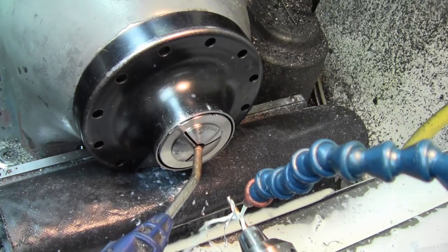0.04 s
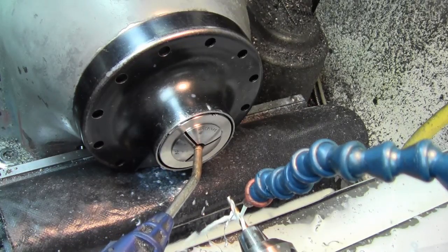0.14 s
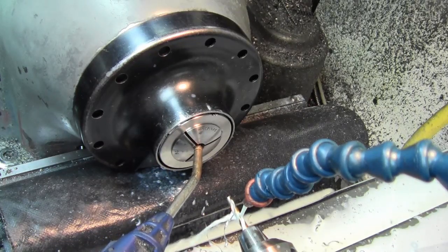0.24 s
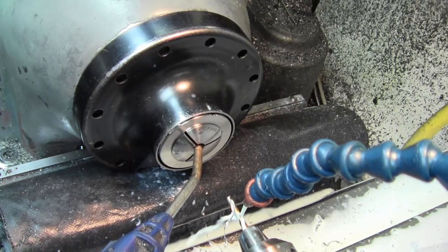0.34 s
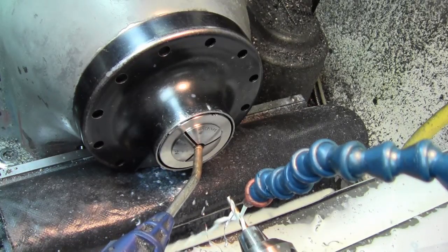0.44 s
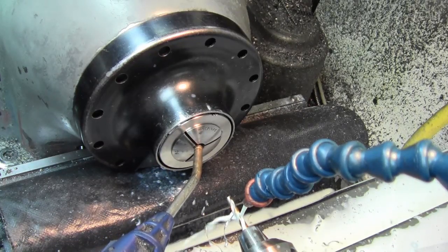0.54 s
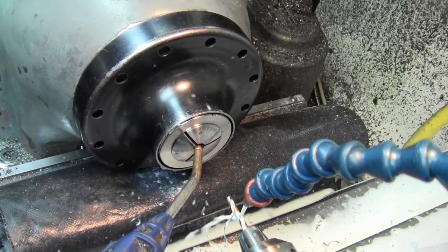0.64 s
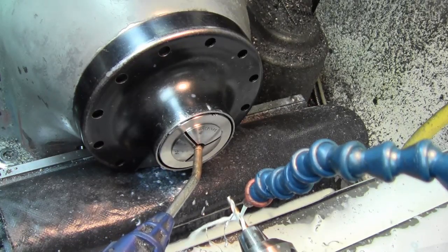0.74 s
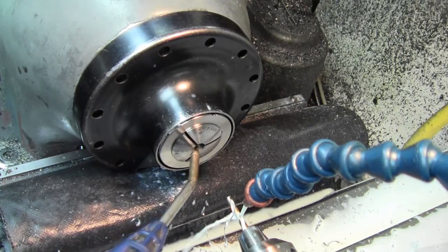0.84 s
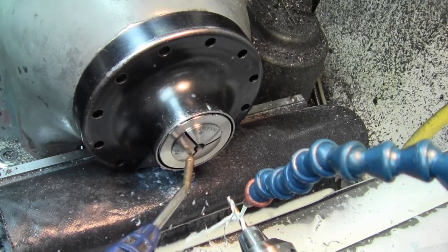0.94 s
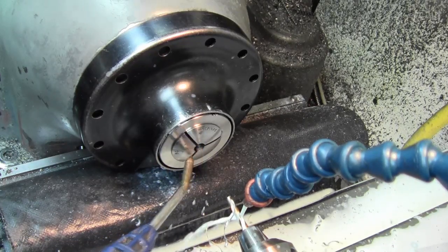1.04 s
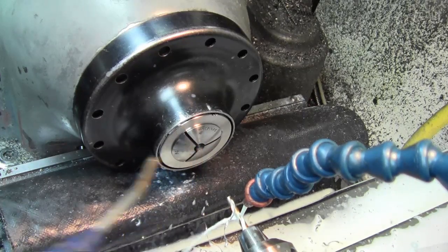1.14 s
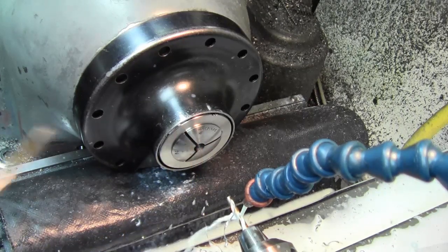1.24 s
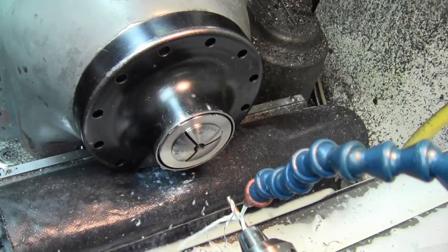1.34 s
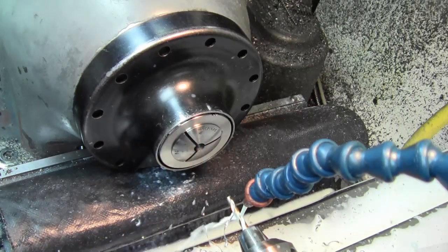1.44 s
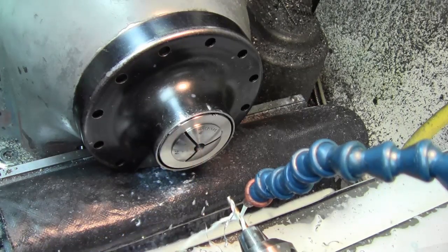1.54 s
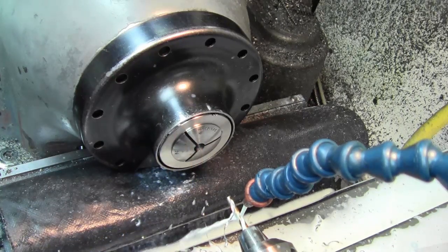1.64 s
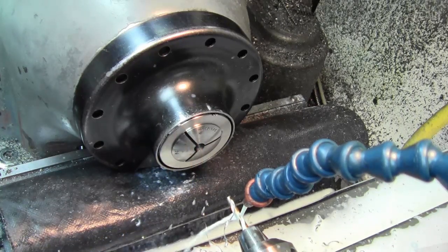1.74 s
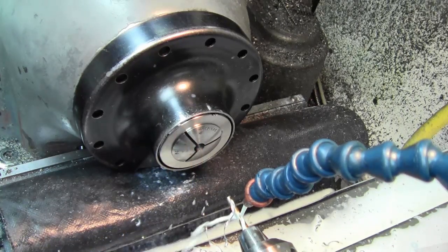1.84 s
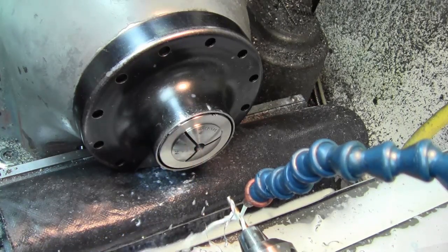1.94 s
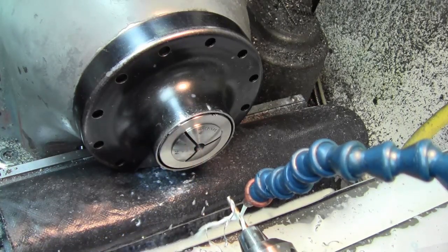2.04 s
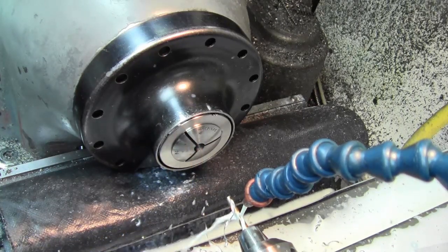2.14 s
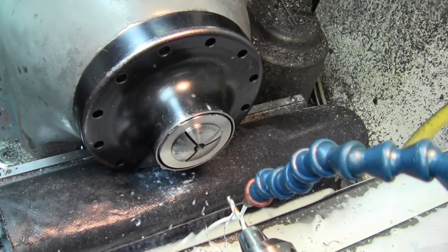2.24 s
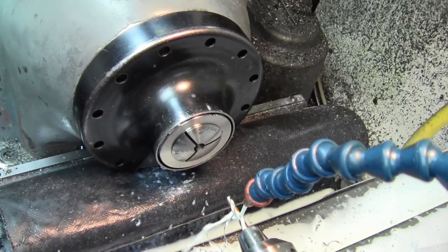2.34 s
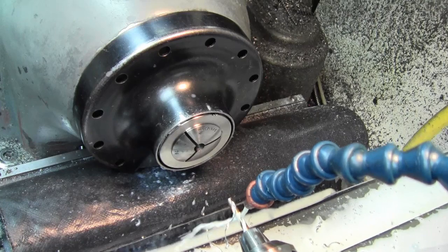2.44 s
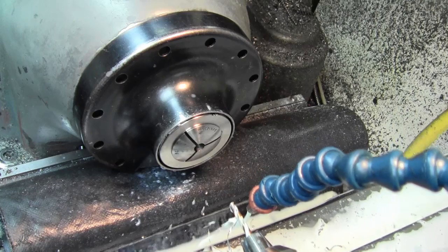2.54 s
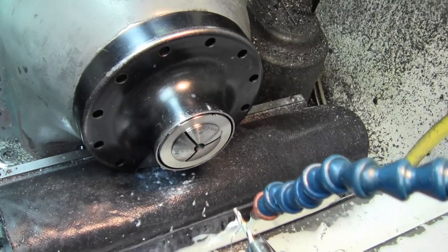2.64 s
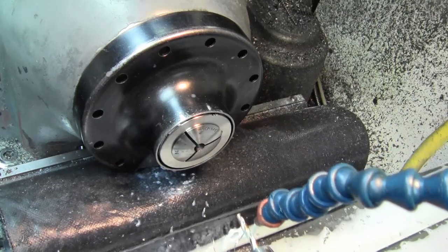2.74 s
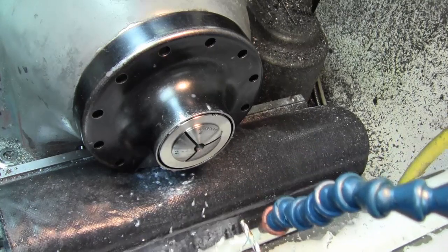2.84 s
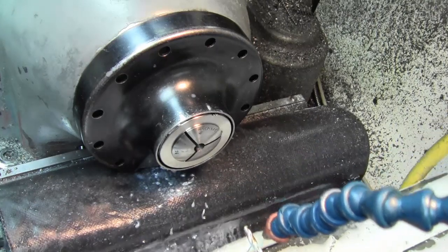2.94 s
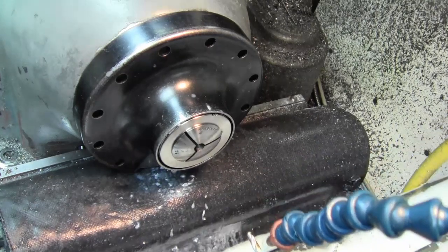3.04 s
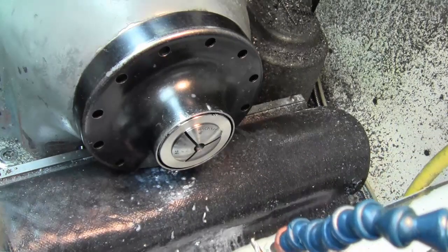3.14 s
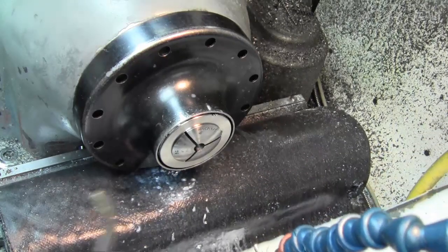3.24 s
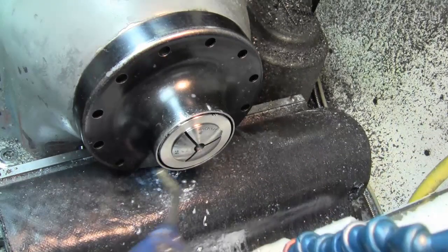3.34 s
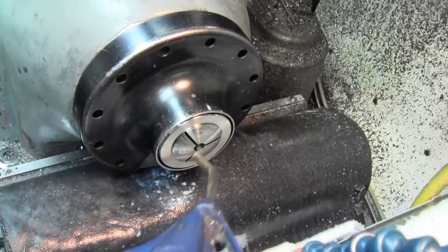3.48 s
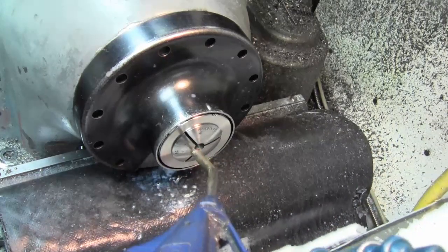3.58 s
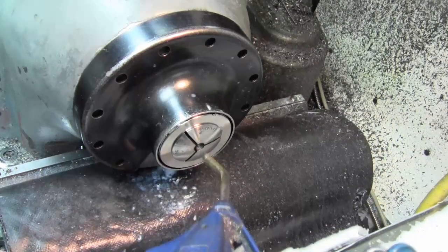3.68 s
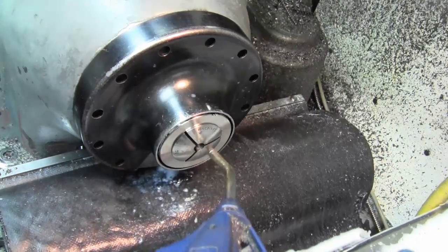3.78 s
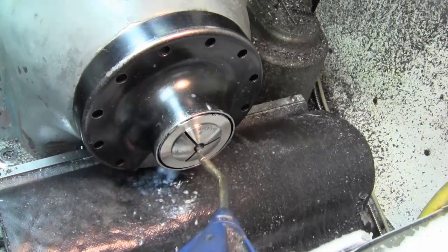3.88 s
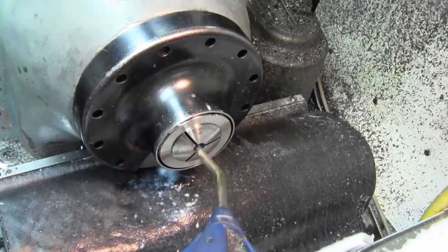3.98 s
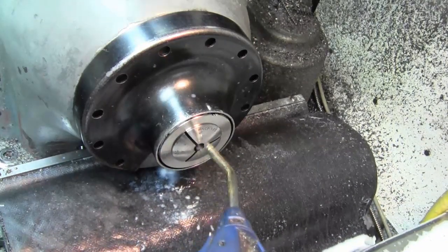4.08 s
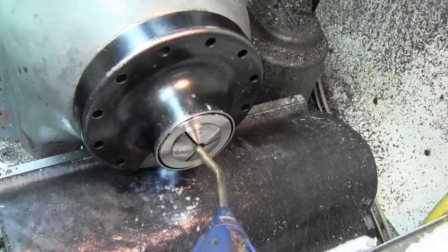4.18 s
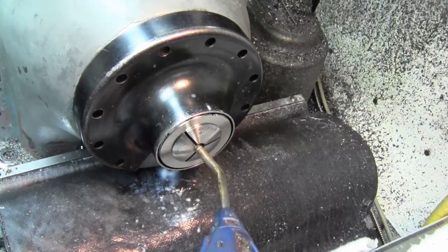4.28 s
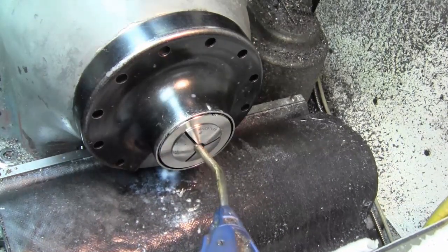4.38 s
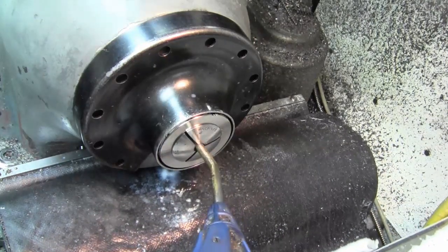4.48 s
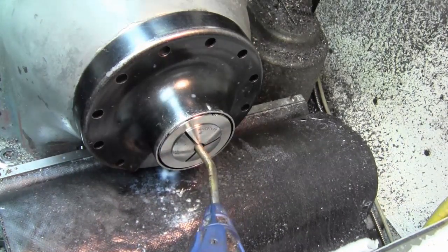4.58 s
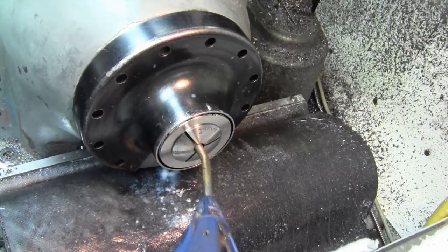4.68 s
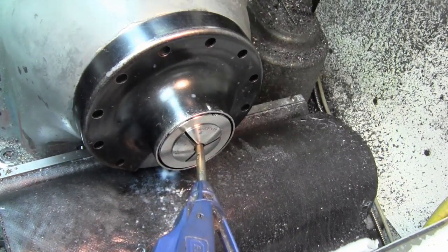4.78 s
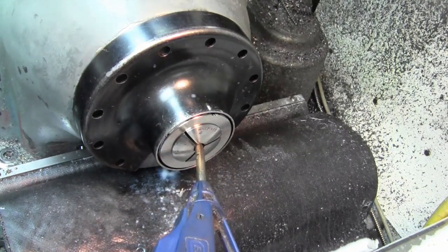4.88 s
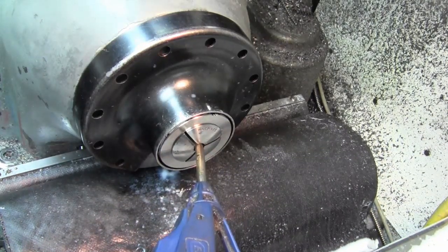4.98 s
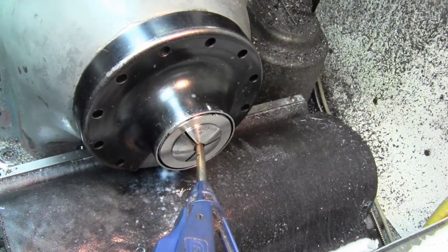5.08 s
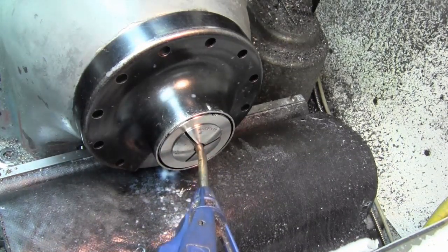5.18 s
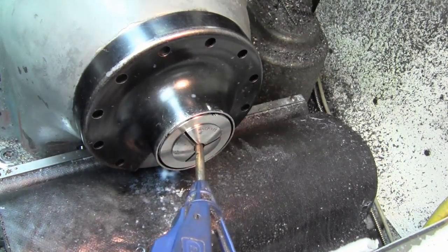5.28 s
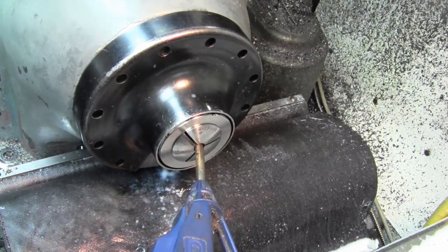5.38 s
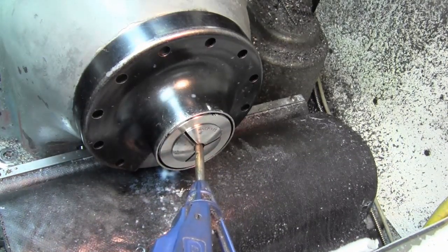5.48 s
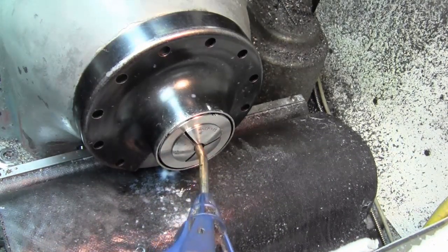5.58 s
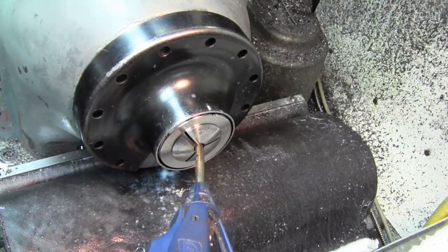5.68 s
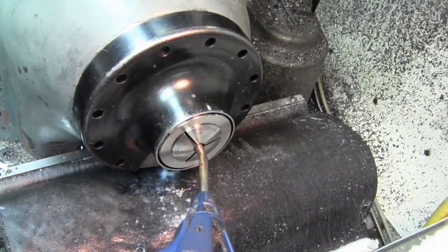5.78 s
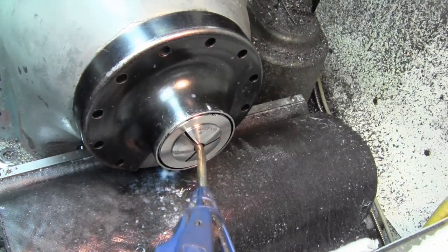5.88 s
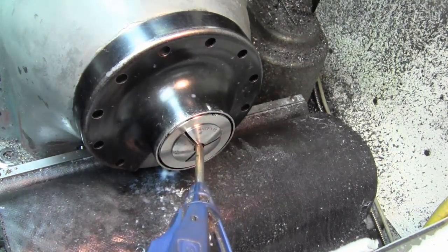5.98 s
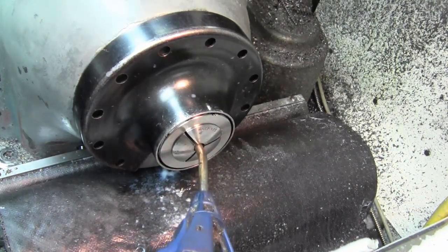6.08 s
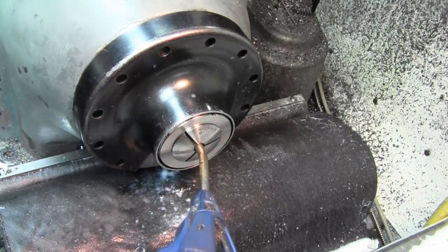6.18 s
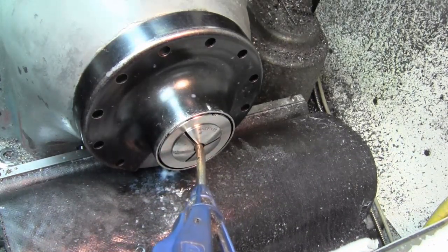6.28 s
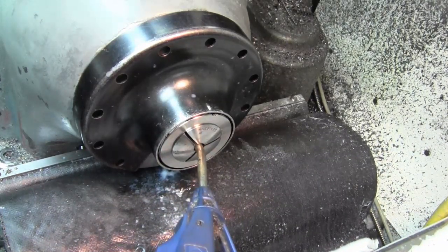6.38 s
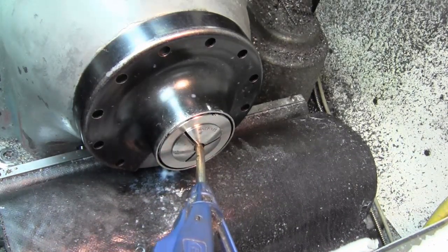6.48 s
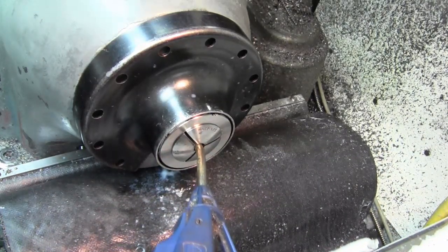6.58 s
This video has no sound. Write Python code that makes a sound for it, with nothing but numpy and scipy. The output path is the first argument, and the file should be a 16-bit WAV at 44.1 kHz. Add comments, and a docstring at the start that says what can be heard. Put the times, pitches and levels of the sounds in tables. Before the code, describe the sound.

Very close, a compressed-air gun roars and hisses on a metal rim for a second, then cuts off abruptly. A machine's pump whines and hums quietly, slowly seeming louder, with dull bumps as a hose is moved. Steel clicks sharply, and a second blast bursts out, sweeping brightly before settling into a steady hiss with breathy, ringing whistle tones. Workshop, short room tail, stereo.

```python
"""A compressed-air gun blows chips out of a lathe collet in two blasts, close to the microphones.
Each jet is flow noise, filtered and fluttering: the first breaks on the collet's rim; the second
crosses its face, then settles in a slot, where noise-driven resonators make the cavity behind it ring.
Between the blasts a hydraulic pump whines as a comb of harmonics, decaying noise bursts make soft bumps,
metal clicks once as damped partials, and a gain control creeps back up."""
import sys
import numpy as np
from scipy import signal
from scipy.fft import rfft, irfft
from scipy.io import wavfile
from scipy.ndimage import uniform_filter1d

SR = 44100
rng = np.random.default_rng(int(sys.argv[2]) if len(sys.argv) > 2 else 0)


def transcribe(signal):
    """Save signal, clipped to [-1, 1], as a 16-bit WAV file at the path in sys.argv[1]."""
    frames = np.atleast_2d(signal).T
    limited = np.clip(frames, -1, 1)
    pcm = np.round(limited * 32767).astype(np.int16)
    wavfile.write(sys.argv[1], SR, pcm)


N = 291942
T = np.arange(N) / SR  # time axis [s]
HZ = np.fft.rfftfreq(N, 1 / SR)  # frequency axis [Hz]
GAIN_RANGE_DB = 14  # boost of the blasts, and the most that the gain control takes away

# valve of the air gun: (starts to open [s], opening time [s], starts to shut [s], shutting time [s])
VALVE_TIMES = [(-.2, .05, 1.0385, 0.033), (4.088, 0.041, 7, .03)]
# the jet catches an edge and flares up:
# (height [s], length [s], relative level [dB], centre [Hz], width [octaves], extra cavity ring [dB])
EDGE_FLARES = [(4.139, 0.087, -21, 3620, 0.15, 6), (4.14, 0.058, -23, 2220, 0.25, 0),
               (4.238, 0.059, -23, 2150, 0.35, 4), (4.468, 0.077, -19.5, 8100, 0.3, 4.5),
               (4.518, 0.085, -19.5, 9500, 0.017, 1.5), (4.533, 0.088, -24, 10200, 0.16, 1),
               (4.816, 0.1, -21.5, 2150, 0.91, 1.5), (4.906, 0.069, -25.5, 2580, 0.47, 8),
               (5.69, 1.21, -25, 1800, 0.23, 3), (6.11, 0.11, -25, 4050, 0.11, 2.5)]
# smooth noise of the idling machine: (frequency [Hz], relative level per Hz [dB])
IDLE_NOISE = [(25, -103), (45, -91), (80, -103), (400, -64), (750, -70.5), (1300, -74.5), (1800, -75.5),
              (3000, -77.5), (4700, -81), (5600, -84), (8500, -90), (10800, -87), (11600, -117),
              (12500, -115)]
# resonances of the machine's panels: (frequency [Hz], half width [Hz], relative level per Hz [dB])
PANEL_MODES = [(60, 5.8, -73.5), (97, 8.9, -63), (121, 4.2, -58.5), (172.5, 6.5, -66.5), (243, 20, -60),
               (312, 16, -62), (537, 23, -52.5), (963, 17, -60), (980, 190, -65), (1273, 56, -59),
               (2340, 65, -65), (3440, 280, -76), (3935, 35, -67.5), (4460, 380, -70.5), (7040, 310, -78.5),
               (7900, 180, -81.5)]


def amp(db):
    """Level is logarithmic: converts decibels to an amplitude gain."""
    return 10 ** (np.asarray(db) / 20)


def unit(x):
    """Normalises the effective value: scales a signal to rms 1."""
    return x / np.sqrt(np.mean(x ** 2) + 1e-20)


def read(points, hz=HZ):
    """Pitch is logarithmic: joins (frequency, value) points on a log-frequency axis."""
    f, value = np.transpose(points)
    return np.interp(np.log(hz + 1), np.log(f + 1), value)


def curves(rows):
    """Linear interpolation in time: each column of a time table, sample by sample."""
    s, *columns = np.transpose(rows)
    return [np.interp(T, s, column) for column in columns]


def add(mix, s, sound):
    """Superposition: mixes a sound in at time s."""
    part = mix[..., round(s * SR):][..., :sound.shape[-1]]
    part += sound[..., :part.shape[-1]]


def drift(rate, size=4096):
    """Low-passed random process: slow chance of rms 1, up to about rate swings a second."""
    hz = np.fft.rfftfreq(size, T[-1] / size)
    low_pass = np.exp(-np.minimum(hz / rate, 20) ** 2)
    slow = irfft(rfft(rng.standard_normal(size)) * low_pass, size)
    return np.interp(T, np.linspace(0, T[-1], size), unit(slow))


def colour(smooth=None, modes=(), hz=HZ):
    """Powers of incoherent parts add: gain of a smooth spectrum with resonances standing on it."""
    power = sum(amp(db) ** 2 / (1 + ((hz - f) / width) ** 2) ** 2 for f, width, db in modes)
    if smooth is not None:
        power = power + amp(read(smooth, hz)) ** 2
    return np.sqrt(power)


def below(edge_hz, hz=HZ):
    """Power-complementary crossover: a steep low-pass gain whose complement is the high-pass."""
    return 1 / np.sqrt(1 + (hz / edge_hz) ** 20)


def hump(centre_hz, octaves, hz=HZ):
    """Gaussian band-pass: a bell on a log-frequency axis."""
    return np.exp(-.5 * (np.log2((hz + 1) / centre_hz) / octaves) ** 2)


def bulge(middle_s, length_s):
    """Super-Gaussian envelope: a round-shouldered rise and fall, 0-1."""
    return np.exp(-np.minimum(abs(2 * (T - middle_s) / length_s), 3) ** 4)


def noise(gain, same=None, lean=None):
    """Partial coherence: coloured stereo noise of rms 1 that the two microphones largely share."""
    # coherence of the jet between the microphones: (frequency [Hz], coherence [0-1])
    jet_same = [(150, .96), (360, .91), (900, .97), (2200, .97), (5400, .965), (13000, .95)]
    # level difference of the jet: (frequency [Hz], left minus right [dB])
    jet_lean = [(60, -10.5), (130, -1), (280, -1.5), (610, -3), (1310, -2.5), (2840, -2), (6140, -2),
                (13300, -3)]
    a, b = rng.standard_normal((2, len(HZ))) + 1j * rng.standard_normal((2, len(HZ)))
    coherence = np.clip(read(same or jet_same), -1, 1)
    side = amp(read(lean or jet_lean) / 2)
    left = a * side
    right = (coherence * a + np.sqrt(1 - coherence ** 2) * b) / side
    return unit(irfft(np.array([left, right]) * gain, N))


def gusty(gain, level_db, flutter_db, rate):
    """Turbulence modulates its own noise: coloured noise that flutters about a level curve."""
    return noise(gain) * amp(level_db + flutter_db * drift(rate))


def resonate(x, hz, width):
    """Driven damped oscillator along the curve hz, its envelope partly levelled to a whistle; rms 1."""
    steadiness = .3  # 0 = noisy ring, 1 = constant envelope
    turn = np.exp(2j * np.pi * np.cumsum(hz) / SR)
    r = np.exp(-2 * np.pi * width / SR)
    # shift the resonance to 0 Hz, filter there, shift back
    ring = signal.lfilter([1], [1, -2 * r, r * r], x * turn.conj())
    levelled = ring / (abs(ring).mean(0) + 1e-12) ** steadiness
    return unit((turn * levelled).real)


def valve(start, opening, stop, shutting):
    """Throttled flow: air 0-1 as the trigger is squeezed and let go."""
    opened = np.clip((T - start) / opening, 0, 1) ** 2
    return opened * np.clip(1 - (T - stop) / shutting, 0, 1) ** 2


def rim_blast():
    """Edge noise: the jet breaks on the rim, bright hiss over roar; a slight wobble of aim sways both."""
    # smooth jet noise on the rim: (frequency [Hz], relative level per Hz [dB])
    rim_noise = [(600, -100), (950, -73), (1200, -59.5), (2500, -60), (5000, -66.5), (7500, -61.5),
                 (10000, -59), (11800, -65.5), (12600, -70), (13300, -86.5)]
    # resonances excited in the collet: (frequency [Hz], half width [Hz], relative level per Hz [dB])
    rim_modes = [(1076, 44, -56), (1180, 51, -74), (1324, 31, -49), (1620, 75, -57), (1845, 71, -59.5),
                 (1926, 56, -53.5), (2290, 82, -56), (2710, 26, -57), (2720, 69, -56.5), (2980, 74, -57),
                 (3250, 55, -53.5), (3535, 144, -57), (4210, 255, -55.5), (4900, 84, -60),
                 (5220, 51, -56.5), (5520, 140, -56), (5920, 75, -55), (6220, 150, -57), (6560, 39, -55.5),
                 (7030, 240, -55), (7580, 370, -54), (8570, 170, -58.5), (9320, 320, -54.5)]
    # surging and slackening of the low roar: (time [s], level change [dB])
    rim_sway = [(0, -4), (.046, 5.5), (.098, -3.5), (.19, 4), (.226, 0.5), (.345, -0.5), (.376, -1.5),
                (.44, 2), (.48, 0.5), (.565, 0.5), (.62, -4.5), (.666, 1.5), (.755, -3), (.81, 1.5),
                (.93, -1), (1.03, -2.5)]
    rim, middle = colour(rim_noise, rim_modes), below(4740)
    sway_db = curves(rim_sway)[0]
    # the sway weakens towards the treble
    hiss = gusty(rim * np.sqrt(1 - middle ** 2), -17.5 + 0.1 * sway_db, flutter_db=1.26, rate=20)
    body = gusty(rim * middle, -22.5 + 0.6 * sway_db, flutter_db=.5, rate=77)
    low = roar(-34 + sway_db, lull_db=0.5)
    return (hiss + body + low + booms()) * valve(*VALVE_TIMES[0])


def slot_blast():
    """Cavity excitation: the hiss changes colour as the jet sinks into the slot and modes take up the air."""
    # the jet's way from the flat face into the slot: (time [s], depth [0-1])
    depth_curve = [(4.12, 0.16), (4.18, 0), (4.59, 0.06), (4.68, 0.6), (4.9, 0.7), (5.2, 0.87), (6.6, 0.9)]
    # hiss as the jet sweeps over the face and settles: (time [s], relative level [dB])
    sweep_hiss = [(4.14, -14.5), (4.28, -15), (4.36, -19), (4.405, -16.5), (4.54, -19), (4.6, -21),
                  (4.75, -22.5), (4.9, -19), (6.6, -18.5)]
    # smooth jet noise on the face, in the slot: (frequency [Hz], relative level per Hz [dB])
    face_noise = [(700, -100), (1100, -62), (2700, -62), (5000, -58), (6200, -53.5), (8000, -52.5),
                  (10300, -53), (12000, -64.5), (12700, -64.5), (13300, -88)]
    slot_noise = [(600, -100), (950, -68.5), (1400, -60.5), (3000, -60), (5000, -58), (7000, -60),
                  (8800, -51), (9800, -55.5), (10800, -75), (12100, -64), (12700, -102), (13300, -100)]
    # resonances of each: (frequency [Hz], half width [Hz], relative level per Hz [dB])
    face_modes = [(3100, 47, -59), (4030, 38, -69), (4470, 90, -56), (5440, 22, -56), (6600, 22, -59),
                  (7710, 190, -46), (8360, 120, -50.5), (9400, 200, -56)]
    slot_modes = [(5980, 37, -50.5), (6870, 50, -51.5), (7580, 220, -51), (8340, 150, -53.5)]
    hiss_db = curves(sweep_hiss)[0]
    depth = np.clip(curves(depth_curve)[0], 0, 1)
    on_face = gusty(colour(face_noise, face_modes), hiss_db, flutter_db=1.0, rate=38)
    in_slot = gusty(colour(slot_noise, slot_modes), hiss_db, flutter_db=0.83, rate=40)
    jet = np.sqrt(1 - depth) * on_face + np.sqrt(depth) * in_slot + roar(-34.5, lull_db=0.0)
    return (jet + cavity(depth) + flares() + lip_whistle()) * valve(*VALVE_TIMES[1])


def cavity(depth, wander=0.0052, flutter_db=1.0):
    """Flow-driven cavity modes: depth feeds them, the covering nozzle detunes them, hand tremor bends them."""
    # how far the nozzle covers the mouth of the slot: (time [s], cover [0-1])
    cover_curve = [(4.78, 0), (4.88, 0.24), (4.95, 1), (5.24, 1), (5.42, 0.78), (5.7, 0.88), (5.8, 0.9),
                   (6.08, 0.88), (6.15, 0.5), (6.28, 0.24), (6.6, 0.33)]
    # modes behind the slot: (frequency in the open slot [Hz], rise on the face [Hz],
    # fall under the nozzle [Hz], half width [Hz], relative level in the open slot [dB],
    # loss on the face [dB], gain under the nozzle [dB])
    cavity_modes = [(1059, 25, 8.1, 45, -38.5, 4.5, 0.5), (1296, 60, 13, 32, -27, 13, -2),
                    (1612, 29, 41, 30, -25, 13.5, -3.5), (1919, 16, 5, 19, -24.5, 14, -7),
                    (2093, 5, 10, 30, -35.5, 11, -1), (2362, 5, 17, 29, -41.5, 4, 7),
                    (2469, 37, 4.5, 15, -25, 14, -14), (2796, 5, 5, 34, -43, 5, -12),
                    (3106, 28, 5, 35, -35.5, 3.5, -26), (3490, 5, 5, 44, -35, 18, -8),
                    (3620, 54, 47, 32, -37, 8, 8), (3894, 33, 21, 44, -36.5, 8, 4.5),
                    (4047, 20, 5, 34, -31.5, 11, -9), (4177, 34, 32, 52, -33.5, 27, 7.5),
                    (4530, 40, 5, 26, -26.5, 37, -10)]
    cover = np.clip(curves(cover_curve)[0], 0, 1)
    air = noise(1)
    flare_db = sum(ring_db * bulge(s, length) for s, length, *_, ring_db in EDGE_FLARES)
    tremor = .006 * drift(7)  # shared by all modes
    out = np.zeros((2, N))
    for hz, face_hz, cover_hz, width, db, face_db, cover_db in cavity_modes:
        detuned_hz = hz + face_hz * (1 - depth) - cover_hz * cover
        pitch = detuned_hz * (1 + tremor + wander * drift(13.5))
        level_db = db - face_db * (1 - depth) + cover_db * cover + flare_db
        out += resonate(air, pitch, width) * amp(level_db + flutter_db * drift(24.0))
    return out


def flares():
    """Edge turbulence: rough swells of band noise as air tears past a sharp edge."""
    return sum(noise(hump(hz, octaves)) * amp(db) * bulge(s, length)
               for s, length, db, hz, octaves, _ in EDGE_FLARES)


def lip_whistle(width_hz=40):
    """Gap resonance: the jet blows one narrow, mostly rising resonance of the closing gap."""
    # breathy whistle as the nozzle slides over the slot's lip:
    # (time [s], frequency [Hz], relative level [dB])
    lip_path = [(4.75, 3120, -57), (4.79, 3140, -26), (4.83, 3440, -34), (4.87, 3550, -37),
                (4.91, 3740, -32), (4.95, 4130, -44), (5.03, 4130, -28), (5.15, 4160, -55)]
    hz, db = curves(lip_path)
    return resonate(noise(1), hz, width_hz) * amp(db)


def roar(level_db, lull_db):
    """Forced resonance: the jet's low noise rings in the cabinet, with brief lulls if lull_db is above 0."""
    # smooth low jet noise: (frequency [Hz], relative level per Hz [dB])
    roar_noise = [(80, -110), (140, -109.5), (220, -66.5), (600, -60), (950, -67), (1200, -100)]
    # resonances of the cabinet: (frequency [Hz], half width [Hz], relative level per Hz [dB])
    cabinet_modes = [(250, 11, -55.5), (357, 9.8, -61), (488.4, 20, -54.5), (766, 87, -59)]
    return noise(colour(roar_noise, cabinet_modes)) * amp(level_db + lull_db * np.minimum(drift(22), 0))


def booms():
    """A single driven mode: short swells of one cabinet resonance under the jet."""
    # brief booms in the first blast: (middle [s], length [s], relative level [dB])
    boom_times = [(0.042, 0.045, -38), (0.18, .05, -32), (.44, 0.084, -31), (0.704, .06, -33)]
    level = sum(amp(db) * bulge(s, length) for s, length, db in boom_times)
    return resonate(noise(1), np.full(N, 487), width=16) * level


def lumpy(x, size=2048):
    """Time-varying filtering: during the blasts the low end gurgles, gaps open and close, and bass dips."""
    # narrow gaps in the low end: (frequency [Hz], width [Hz], readiness to open [0-1])
    gap_bands = [(145, 55, 1), (388, 76, .8), (675, 74, .85), (940, 72, 1)]
    # how hollow the low end sounds: (time [s], hollowness [0-1])
    hollow_curve = [(0, .44), (1.03, .44), (4.13, 0), (4.18, 1), (4.28, 1), (4.33, .5), (4.43, .52),
                    (4.48, 1), (4.58, 1), (4.64, .25), (6.6, .34)]
    # brief drop-outs of the bass: (middle [s], length [s], level change [dB])
    bass_dips = [(.17, .13, -33), (0.746, 0.065, -16), (0.983, 0.12, -25)]
    gap_db, patchy_db, top_hz = 24, 2.5, 1050
    chance, opens_at, edge = .17, .45, .06  # random share, threshold and softness of the gaps
    hz, s, z = signal.stft(x, SR, nperseg=size, noverlap=size * 3 // 4)
    grain = uniform_filter1d(rng.standard_normal(z.shape[1:]), size=5, axis=0)
    patches = unit(uniform_filter1d(grain, size=6, axis=1))
    readiness = sum(ready * np.exp(-np.minimum(abs(hz[:, None] - f) / width, 3) ** 4)
                    for f, width, ready in gap_bands)
    openness = readiness * np.interp(s, *np.transpose(hollow_curve)) - chance * patches
    gaps = .5 + .5 * np.tanh((openness - opens_at) / edge)
    dips_db = np.interp(s, T, sum(db * bulge(middle, length) for middle, length, db in bass_dips))
    blowing = np.interp(s, T, sum(valve(*row) for row in VALVE_TIMES))
    db = (patchy_db * np.minimum(patches, 1) - gap_db * gaps) * below(top_hz, hz)[:, None]
    db = db + dips_db * below(290, hz)[:, None]
    return signal.istft(z * amp(db * blowing), nperseg=size, noverlap=size * 3 // 4)[1][:, :N]


def touches(crack_db=-13, crack_t60=0.0044, tick_db=1.0):
    """Impact of steel on steel, damped by the hand: a sharp tick, a dry crack and a very short ring."""
    # the nozzle touches the collet and bounces lightly: (time [s], peak level [dB])
    contacts = [(3.8664, -2.2), (3.8675, -11.5)]
    # partials of the steel: (frequency [Hz], relative level [dB], t60 [s])
    steel_partials = [(1400, -19, .025), (1900, -25, 0.022), (2430, -24, 0.018), (3700, -16, 0.0082),
                      (4370, -14, .007), (6200, -20, 0.0041), (7160, -16, 0.0061), (8200, -8, 0.003),
                      (10300, -8, 0.0017)]
    out, t = np.zeros(N), T[:SR // 10]
    ring = sum(amp(db - 60 * t / t60) * np.sin(2 * np.pi * hz * t) for hz, db, t60 in steel_partials)
    high_pass = signal.butter(2, 1700, "high", fs=SR, output="sos")
    low_pass = signal.butter(14, 11300, fs=SR, output="sos")
    band = np.vstack([high_pass, low_pass])
    for s, db in contacts:
        crack = rng.standard_normal(len(t)) * amp(crack_db - 60 * t / crack_t60)
        tick = amp(tick_db) * (t == 0)
        snap = signal.sosfilt(band, ring + crack + tick)
        add(out, s, amp(db) * snap / abs(snap).max())
    return out * amp([[-1], [1]])  # slightly to the right


def knocks():
    """Exponential decay: dull, damped bumps of band noise."""
    # the coolant hose and the gun are moved:
    # (time [s], level before decay [dB], centre [Hz], width [octaves], t60 [s])
    bumps = [(1.576, -35, 330, 1.3, 0.083), (1.835, -31, 1100, 1.2, .05), (2.597, -27.5, 100, .35, 0.37),
             (2.67, -35, 327, 0.087, 0.47), (2.755, -32, 319, 0.039, 0.41), (3.148, -38, 95, 0.24, .18),
             (3.189, -27, 540, 0.86, 0.23), (3.196, -33, 1320, .2, 0.12), (3.228, -31, 260, 0.16, 0.2),
             (3.755, -32, 480, 0.74, .3), (3.805, -29.5, 300, 0.4, 0.12)]
    out, t = np.zeros(N), T[:SR // 2]
    hz_axis = np.fft.rfftfreq(len(t), 1 / SR)
    for s, db, hz, octaves, t60 in bumps:
        body = irfft(rfft(rng.standard_normal(len(t))) * hump(hz, octaves, hz_axis), len(t))
        attack = 1 - np.exp(-t / 0.002)
        add(out, s, unit(body) * amp(db - 60 * t / t60) * attack)
    return out * amp([[-1], [1]])


def pump(wander=0.000387, odd_db=-5.0, size=8192):
    """Fourier series: each turn repeats one rattle, a dense comb of uneven lines shaped by the panels."""
    turns_per_s = 23.51
    order = np.arange(size // 2 + 1)
    hz = turns_per_s * order
    uneven_db = 3 * rng.standard_normal(len(hz))
    # (frequency [Hz], change against the idle colour [dB])
    shape_db = read([(500, -9), (850, -11), (1350, -9), (1600, 1.5), (2300, -2.5), (4800, 2.0),
                     (6000, 2.5), (9000, -20)], hz)
    lines = colour(IDLE_NOISE, PANEL_MODES, hz) * amp(shape_db + uneven_db + odd_db * (order % 2))
    # phases in turns, nearly alike in both microphones
    phase = rng.random(len(hz)) + 0.028 * rng.standard_normal((2, len(hz)))
    cycle = irfft(lines * np.exp(2j * np.pi * phase))
    turns = np.cumsum(turns_per_s * (1 + wander * drift(4.8))) / SR
    return unit(np.array([np.interp(turns % 1 * size, np.arange(size), c) for c in cycle]))


def machine():
    """Broadband and tonal sources add: oil hiss, rumble, the pump's whine and the motor's steady tones."""
    # coherence of the idle noise between the microphones: (frequency [Hz], coherence [0-1])
    idle_same = [(60, 1), (360, 0.96), (900, 0.91), (2200, 0.98), (5400, 1), (12000, 0.4)]
    # level difference of the idle noise: (frequency [Hz], left minus right [dB])
    idle_lean = [(60, 1.5), (180, -1), (520, -2.2), (1530, -1), (4510, -7), (12000, 4)]
    # low rumble, strongest while the coolant hose is pushed aside: (time [s], relative level [dB])
    rumble_curve = [(.95, -49), (1.15, -32), (2.25, -33), (2.65, -27), (3.45, -31.5), (4.1, -30),
                    (4.35, -35)]
    # steady tones: (frequency [Hz], mean level [dB])
    motor_tones = [(355.5, -41), (844, -59), (980, -54), (1035, -53), (1061, -45.5), (1109, -50),
                   (1269, -50.5), (1315, -52), (1351, -43), (1383, -57), (1555, -59), (2281, -58),
                   (2304, -58), (2351, -58), (3219, -61), (3494, -57), (3967, -55), (4221, -56),
                   (4328, -54), (4398, -51), (4511, -54), (4544, -54), (4613, -57)]
    idle, low = colour(IDLE_NOISE, PANEL_MODES), below(206)
    hiss = amp(-37.0) * noise(idle * np.sqrt(1 - low ** 2), idle_same, idle_lean)
    rumble = amp(curves(rumble_curve)[0] - 14.5) * noise(idle * low, idle_same, idle_lean)
    clock = T + np.cumsum(0.00052 * drift(4.2)) / SR  # the tones waver in pitch together
    tones = np.zeros((2, N))
    for hz, db in motor_tones:
        phase = 2 * np.pi * rng.random() + 0.33 * rng.standard_normal((2, 1))
        waver = amp(1.2 * drift(9))
        tones += np.sqrt(2) * amp(db) * waver * np.sin(2 * np.pi * hz * clock + phase)
    return hiss + rumble + (tones + amp(-40.0) * pump()) * amp([[-1], [1]])


def swell():
    """Amplitude modulation: one machine tone swells for a moment."""
    # (middle [s], length [s], peak level [dB], frequency [Hz])
    s, length, db, hz = (3.575, .17, -35.5, 1055)
    return amp(db) * bulge(s, length) * np.sin(2 * np.pi * hz * T) * amp([[-1], [1]])


def workshop(x, t60):
    """Reverberation as convolution: a diffuse decaying tail, different in each microphone."""
    t = T[:SR * 3 // 4]
    build_up = 1 - np.exp(-t / 0.0036)
    tail = rng.standard_normal((2, len(t))) * amp(-60 * t / t60) * build_up
    return signal.fftconvolve(x, tail / np.linalg.norm(tail[0]), axes=1)[:, :N]


def scene():
    """Superposition: loud blasts, bumps and a nearly dry click, their room tail, and the machine."""
    near = amp(GAIN_RANGE_DB) * (rim_blast() + slot_blast()) + knocks()
    click = touches()
    click_send = amp(-7)
    room = amp(-11.0) * workshop(near + click_send * click, t60=0.29)
    return lumpy(near + click + room + machine() + swell())


def record(dry, threshold_db=-21, recovery_db=15.0, hold=0.0094):
    """Dynamic compression of limited range: falls fast, holds, recovers slowly; then clip and band limit."""
    # recovery_db in dB per second, hold in seconds
    power_db = 10 * np.log10(abs(uniform_filter1d((dry ** 2).mean(0), size=1600)) + 1e-12)
    over_db = np.clip(power_db - threshold_db, 0, GAIN_RANGE_DB + hold * recovery_db)
    fall = T * recovery_db
    duck_db = np.minimum(np.maximum.accumulate(over_db + fall) - fall, GAIN_RANGE_DB)
    ducked = np.clip(dry / amp(uniform_filter1d(duck_db, size=300)), -.9, .9)
    band_limit = signal.firwin(511, 13700, window=("kaiser", 9), fs=SR)
    return signal.oaconvolve(ducked, band_limit[None], "same")


dry = scene()
out = record(dry)
transcribe(out)
```